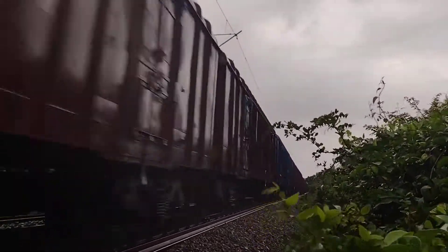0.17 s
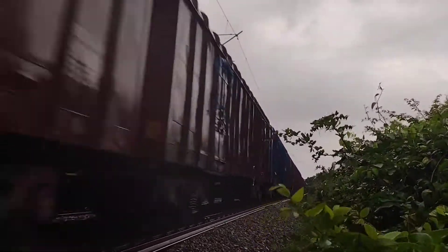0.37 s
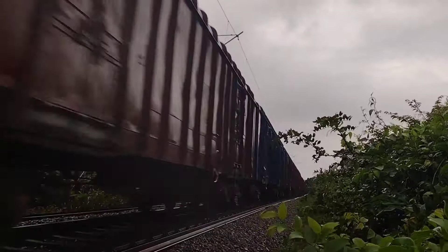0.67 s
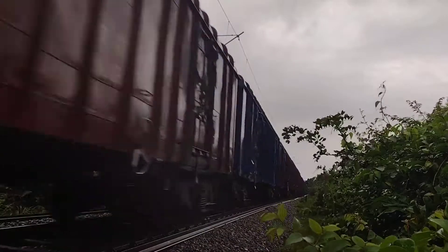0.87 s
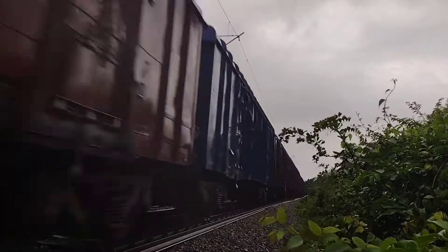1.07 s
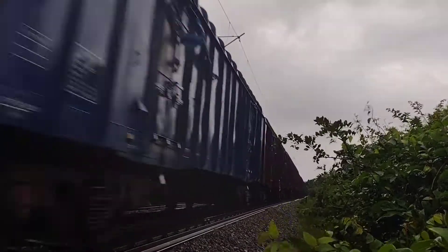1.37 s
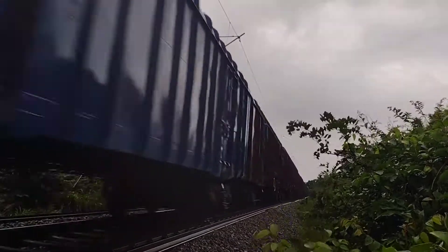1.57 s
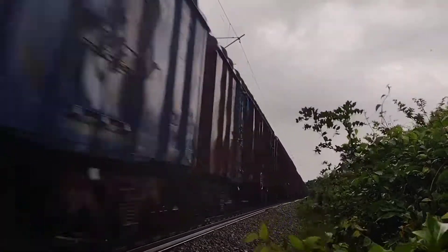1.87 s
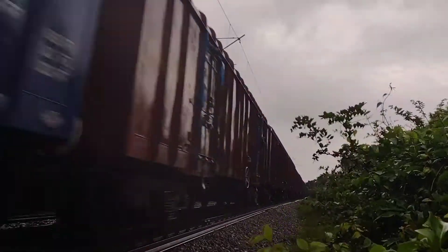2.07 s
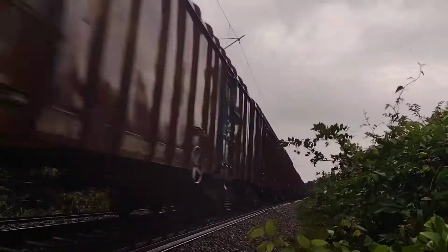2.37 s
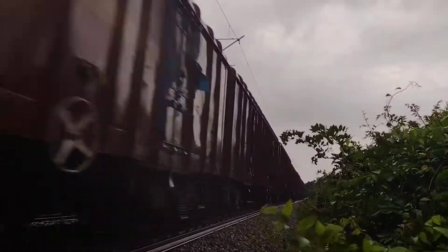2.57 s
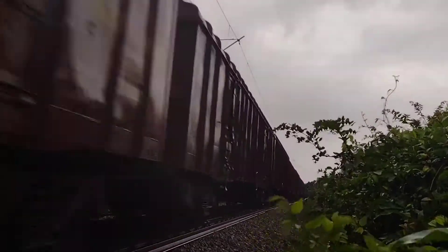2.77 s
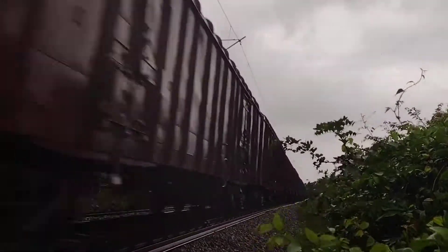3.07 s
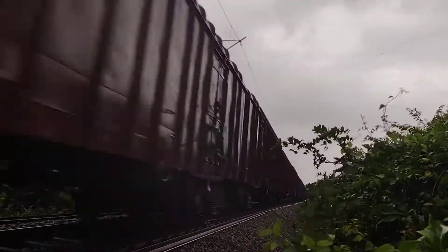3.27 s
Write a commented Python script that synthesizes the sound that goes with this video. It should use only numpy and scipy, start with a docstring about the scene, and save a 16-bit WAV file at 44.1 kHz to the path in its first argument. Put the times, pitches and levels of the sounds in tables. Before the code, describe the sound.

Freight wagons pass at close range, booming and roaring on the rails with short metal squeaks.

```python
"""A deep boom and a steely roar, there from the start: freight wagons rolling past a phone by the track.
Bodies and ground boom and rumble, the bodies resonate in a low drone, wheels and rails roar and ring.
Brake gear and flanges hiss in jolts, and metal squeaks briefly on metal. The phone's two microphone
ports hear the bass alike and the treble apart."""
import sys
import numpy as np
from scipy import signal
from scipy.fft import rfft, irfft, next_fast_len
from scipy.io import wavfile
from scipy.ndimage import uniform_filter1d

SR = 44100
rng = np.random.default_rng(int(sys.argv[2]) if len(sys.argv) > 2 else 0)


def store_wav(level_fs):
    """Save 16-bit WAV to argv[1]."""
    pcm = np.round(np.clip(np.atleast_2d(level_fs), -1, 1) * 32767)
    wavfile.write(sys.argv[1], SR, pcm.T.astype(np.int16))


N = 151263


def undb(db):
    return 10 ** (np.asarray(db) / 20)


def unit_rms(x):
    return x / np.sqrt(np.mean(x ** 2))


def over_hz(table, hz):
    """Read a curve of (Hz, value) points on a log frequency axis."""
    points_hz, values = np.array(table).T
    return np.interp(np.log(np.maximum(hz, 1)), np.log(points_hz), values)


def wander(rate_hz):
    """Smooth random modulation with a spread near 1."""
    hold = max(int(SR / rate_hz), 2)
    steps = np.repeat(rng.standard_normal(N // 2 + 1)[:N // hold + 1], hold)
    return 1.332 * uniform_filter1d(uniform_filter1d(steps, hold), hold)[:N]


# How alike the ports sound. Each row: frequency in Hz, share of the power common to both.
PORT_SHARE = [(60, 1), (340, 0.91), (600, 0.62), (1100, 0.37), (1550, 0.49), (2200, 0.1), (5000, 0.033)]
# Phase between the ports. Each row: frequency in Hz, lead of the left in radians.
PORT_PHASE = [(60, 0), (260, 0.1), (600, 0.58), (860, -0.2), (1100, 3), (1550, 3), (2000, 2.5), (2400, 7)]
def port_noise(gains, hz, size):
    """Shaped stereo noise: a common part, phase-shifted on the right, plus each port's own."""
    noise = rfft(rng.standard_normal((3, size)))
    share = over_hz(PORT_SHARE, hz)
    common = noise[0] * np.array([np.ones(len(hz)), np.exp(-1j * over_hz(PORT_PHASE, hz))])
    return irfft(gains * (np.sqrt(share) * common + np.sqrt(1 - share) * noise[1:]), size)


def noise_bed(spectrum, level_db, flicker_db, flicker_hz, bands):
    """Overlapping noise bands that ride one fader while each flickers alone."""
    size = next_fast_len(N)
    hz = np.fft.rfftfreq(size, 1 / SR)
    edges = np.linspace(np.log(spectrum[0][0]), np.log(spectrum[-1][0]), bands + 1)
    step, bed = edges[1] - edges[0], 0
    for centre in edges[:-1] + step / 2:
        offset = np.clip((np.log(np.maximum(hz, 1)) - centre) / step, -1, 1)
        gains = undb(over_hz(spectrum, hz)) * np.cos(np.pi / 2 * offset)
        bed += port_noise(gains, hz, size)[:, :N] * undb(flicker_db * wander(flicker_hz))
    return unit_rms(bed) * undb(level_db)


# The low end, boom under rumble. Each row: frequency in Hz, relative level in dB.
BOOM_EQ = [(16, -8), (30, 2), (49, -4), (62, -1), (90, -5.5), (115, -12.5)]
RUMBLE_EQ = [(105, -4.5), (134, -3), (170, 0.5), (254, -2), (340, -8.5), (450, -13)]
def bodies_and_ground(boom_db, rumble_db):
    """Wagon bodies and ground shake; the bodies' drone rides the boom's fader."""
    boom = noise_bed(BOOM_EQ, boom_db - 2.5, flicker_db=0.32, flicker_hz=6.2, bands=3)
    drone = body_drone() * undb(boom_db - 3)
    return boom + drone + noise_bed(RUMBLE_EQ, rumble_db, flicker_db=1.2, flicker_hz=10.05, bands=6)


def body_drone(centre_hz=49.1, drift=0.1486):
    """The wagon bodies resonate: an even, low drone whose pitch wanders."""
    pitch_hz = centre_hz * (1 + drift * wander(12))
    return unit_rms(np.sin(2 * np.pi * np.cumsum(pitch_hz) / SR))


# The mids, rail roar under wheel ring. Each row: frequency in Hz, relative level in dB.
ROAR_EQ = [(430, -2), (560, 1.5), (800, 0.5), (960, 1), (1050, -2.5), (1300, -1), (1550, -1.5),
           (1700, -14.5)]
RING_EQ = [(1650, 3), (1850, 0), (2000, -1), (2400, 2.5), (3000, -1), (3700, -4)]
def rail_roar(level_db):
    """Rails roar under the rolling wheels."""
    return noise_bed(ROAR_EQ, level_db, flicker_db=1.0, flicker_hz=11.42, bands=4)


def wheel_ring(level_db):
    """The wheels ring in a broad, bright band of noise."""
    return noise_bed(RING_EQ, level_db, flicker_db=0.96, flicker_hz=14, bands=5)


# The top end, hiss under its airy sheen. Each row: frequency in Hz, relative level in dB.
HISS_EQ = [(3600, -2.5), (4600, -3.5), (5800, -2.5), (6600, 0.5), (7600, -1), (8800, -2), (10000, -2.5),
           (10500, -8.5)]
SHEEN_EQ = [(10400, 2), (11500, -4), (13000, -8), (14500, -11.5), (16000, -14)]
def brake_hiss(hiss_db, sheen_db):
    """Brake gear and flanges hiss in two flickering layers."""
    hiss = noise_bed(HISS_EQ, hiss_db, flicker_db=1.0, flicker_hz=14, bands=10)
    return hiss + noise_bed(SHEEN_EQ, sheen_db, flicker_db=1.05, flicker_hz=13, bands=3)


# The placed jolts. Each row: peak time in seconds, swell or dip of the hiss in dB.
GEAR_JOLTS = [(.15, 3.5), (.285, 2.5), (0.488, 3), (.53, -3), (0.653, 2), (.77, 1.5), (0.815, 1),
              (1.055, -1.5), (1.38, 0), (1.545, 0.5), (2.15, -2.5), (2.258, 2), (2.77, -4), (2.845, 3),
              (2.92, 4), (3.045, 1.5), (3.18, -1), (3.25, 2)]
def gear_jolts(t, width_s=0.0074, small_db=0.98):
    """Jolts through the running gear as a dB curve: quick bumps over small random ones."""
    bumps = sum(db * np.exp(-.5 * ((t - peak_s) / width_s) ** 2) for peak_s, db in GEAR_JOLTS)
    return bumps + small_db * wander(65)


def squeak(size, length_s, pitch_hz, width_hz, sag_per_s=0.117):
    """Metal on metal: a rough tone swells and fades, sinking as the wheel draws away."""
    t = np.arange(size) / SR
    jitter = uniform_filter1d(rng.standard_normal(size), 24) * np.sqrt(2 * np.pi * width_hz / SR)
    phase = 2 * np.pi * pitch_hz * (1 - sag_per_s * (t - length_s) / 2) * t + np.cumsum(jitter)
    swell = np.sqrt(np.abs(np.sin(np.pi * np.clip(t / length_s, 0, 1) ** 0.83)))
    return np.sqrt(2) * np.sin(phase + [[0], [np.pi / 2]]) * swell  # ports a quarter turn apart


# The clear squeaks. Each row: start and length in seconds, pitch and width in Hz, level in dB.
CLEAR_SQUEAKS = [(0.36, 0.081, 6600, 60.6, -31), (.33, 0.12, 9560, 300, -29), (0.47, .04, 9540, 400, -24),
                 (0.468, 0.038, 4840, 200, -24.5), (0.473, 0.05, 4340, 100, -29),
                 (0.54, 0.125, 4290, 60, -33), (.545, 0.12, 2450, 119, -28), (0.638, 0.023, 2990, 150, -27),
                 (0.666, 0.069, 8900, 90, -26), (0.785, 0.085, 8750, 70, -26.5),
                 (0.791, .04, 4520, 250, -27.5), (1.347, 0.082, 2300, 251, -25),
                 (1.35, 0.16, 5660, 250, -28), (1.434, 0.27, 10130, 300, -30.5),
                 (1.504, 0.085, 5100, 25, -22.5), (1.528, 0.07, 6680, 250, -20),
                 (1.499, 0.15, 7470, 100, -28.5), (1.617, .36, 6350, 25, -30.5),
                 (1.718, 0.2, 4750, 30, -29.5), (1.88, .1, 5350, 60, -29.5), (2.004, .12, 9850, 604, -28),
                 (2.392, 0.081, 9800, 40, -28), (2.831, 0.14, 6750, 450, -24), (2.97, 0.12, 6680, 400, -23),
                 (3.122, .13, 11360, 200, -40), (3.2, .2, 13700, 250, -40), (3.34, 0.091, 11100, 150, -29)]
def metal_squeaks(chatter_db=2.5, chatter_hz=110, faint_width_hz=40):
    """Brake gear and flanges squeak: clear ones among many faint ones, each with its own chatter."""
    track = np.zeros((2, N + 20000))
    chatter = undb(chatter_db * wander(chatter_hz))
    faint = []
    for when, length, height, strength in rng.random((500, 4)):
        db = -42 + over_hz(HISS_EQ + SHEEN_EQ[1:], 1800 * 8.0 ** height) + 5 * strength
        faint.append((when * N / SR, .045 * (.5 + length), 1800 * 8.1 ** height, faint_width_hz, db))
    for start_s, length_s, pitch_hz, width_hz, db in CLEAR_SQUEAKS + faint:
        start, size = int(start_s * SR), int(length_s * SR) + 1
        own_chatter = np.take(chatter, rng.integers(N) + np.arange(size), mode="wrap")
        track[:, start:start + size] += squeak(size, length_s, pitch_hz, width_hz) * undb(db) * own_chatter
    return track[:, :N]


def pan(left_db):
    return undb(np.array([left_db, -left_db]) / 2)


# Fader moves as the wagons pass. Each row: time in seconds, faders in dB for boom, rumble, roar,
# ring, hiss and sheen, then pan of the lows and of the highs in dB left over right.
WAGON_FADERS = [(0, -18.5, -20, -28.5, -27, -24, -34.5, -2.3, -2.5),
                (0.2, -18, -19, -28, -28.5, -23, -32, 0, -2.5),
                (0.42, -18, -19, -30, -28, -23.5, -34.5, -1.5, 0.5),
                (0.77, -19, -18.5, -27, -27, -23, -34, -1, -2),
                (0.95, -18, -18, -29.5, -26, -23.5, -33.5, -1.5, -3),
                (1.25, -16, -19, -26, -25.5, -21.5, -30, -2, 1),
                (1.45, -24, -24.5, -29, -23, -19.5, -32, -2, 1),
                (1.6, -24.5, -24.5, -30.5, -27, -20.5, -32.5, 0.8, 0.7),
                (1.8, -21, -21.5, -30.5, -25, -21, -31, 2, -1.3),
                (2.08, -21, -24.5, -28.5, -23.5, -17.5, -29, 0.5, 3),
                (2.3, -19.5, -25.5, -30.5, -24, -19.5, -28, 1, -1.7),
                (2.5, -20.5, -23.5, -32, -26.5, -21, -32, 1.5, -1.3),
                (2.65, -21, -18, -28.5, -28.5, -22, -34, 0.5, -5.5),
                (2.8, -17.5, -22.5, -29, -27, -21, -32, -0.7, 0.8),
                (2.97, -22, -24, -35.5, -31, -23, -32, -2, -1.2),
                (3.15, -17, -20.7, -27.5, -25.5, -20.5, -28.5, 1, -0.8),
                (3.43, -20.5, -19, -29.5, -27, -23, -28.5, -1, -2.5)]
# The ports' differing colour. Each row: frequency in Hz, left over right in dB.
PORT_BALANCE = [(60, 5), (300, 3.5), (700, 5), (950, 0), (1150, 2), (1600, 2), (2300, -0.5), (2900, -4.5),
                (4600, -5.5), (6000, -5), (7500, -6.5), (9500, 0.5), (12500, 5), (15500, 2)]
def scene():
    """Mix the passing wagons, jolt the mids and highs, and colour each port."""
    t = np.arange(N) / SR
    times, *moves = np.array(WAGON_FADERS).T
    boom, rumble, roar, ring, hiss, sheen, low_pan, high_pan = (np.interp(t, times, m) for m in moves)
    jolt = gear_jolts(t)
    lows = bodies_and_ground(boom, rumble) + rail_roar(roar + 0.68 * jolt)
    highs = wheel_ring(ring + 1.25 * jolt) + brake_hiss(hiss + jolt, sheen + 1.65 * jolt)
    highs += metal_squeaks()
    mix = lows * pan(low_pan) + highs * pan(high_pan)
    balance_db = over_hz(PORT_BALANCE, np.fft.rfftfreq(N, 1 / SR))
    return irfft(rfft(mix) * pan(balance_db), N)


def record(dry):
    """The phone's gain control gently evens out quick changes of level, and a low-pass cuts the top."""
    target_db, ratio, window_s, top_hz = -15.5, 1.08, 0.0325, 15750
    power = uniform_filter1d(np.mean(dry ** 2, axis=0), int(window_s * SR)) + 1e-9
    gain = (undb(target_db) ** 2 / power) ** ((1 - 1 / ratio) / 2)
    return signal.sosfilt(signal.ellip(12, .2, 80, top_hz, fs=SR, output="sos"), dry * gain)


dry = scene()
out = record(dry)
store_wav(out)
```